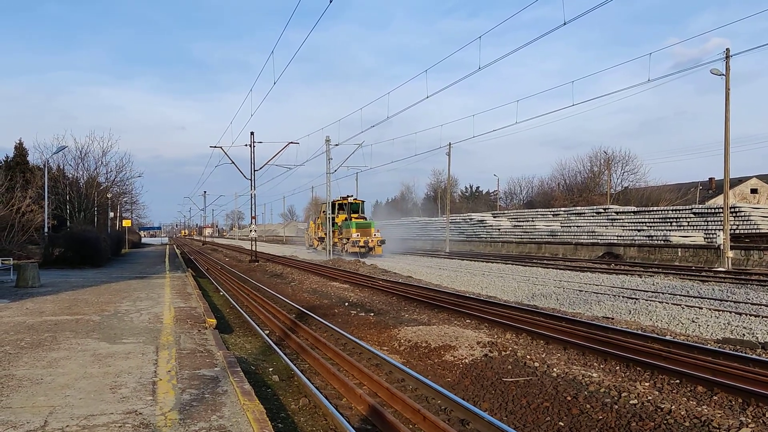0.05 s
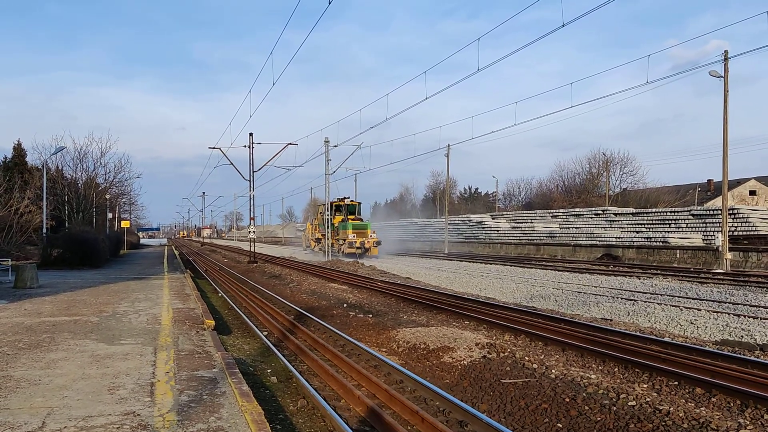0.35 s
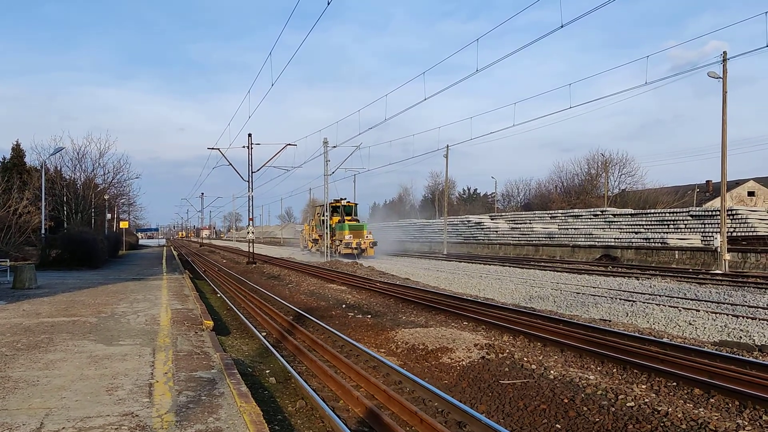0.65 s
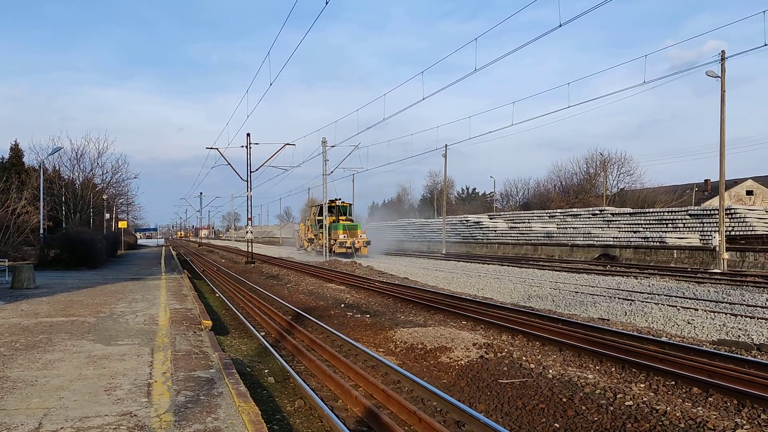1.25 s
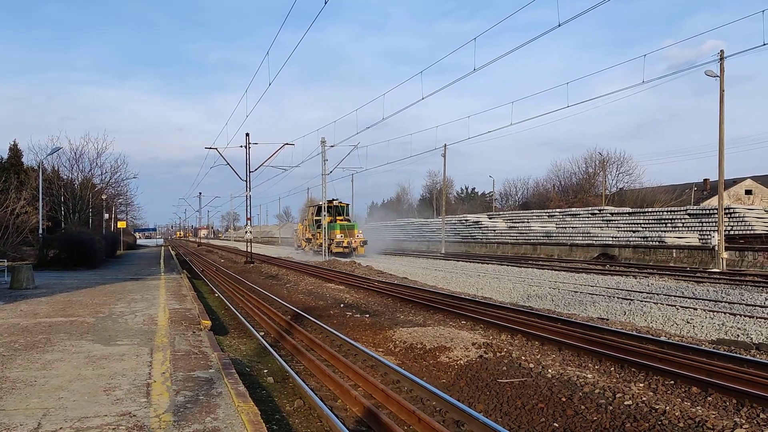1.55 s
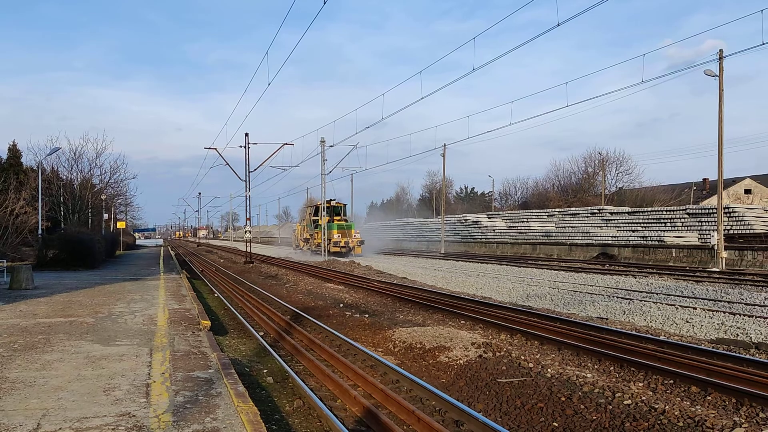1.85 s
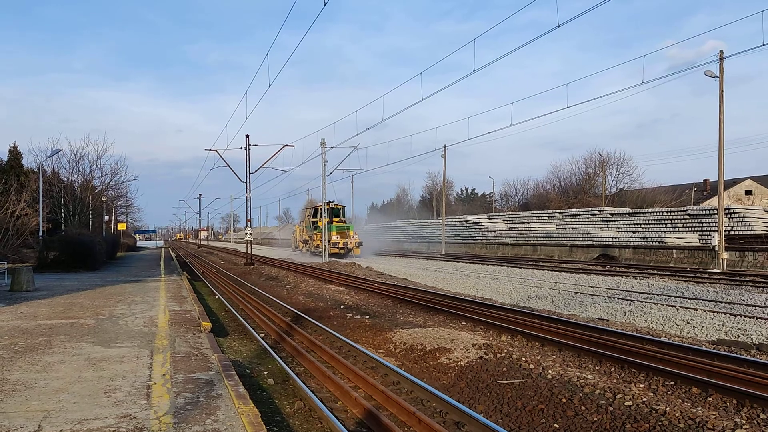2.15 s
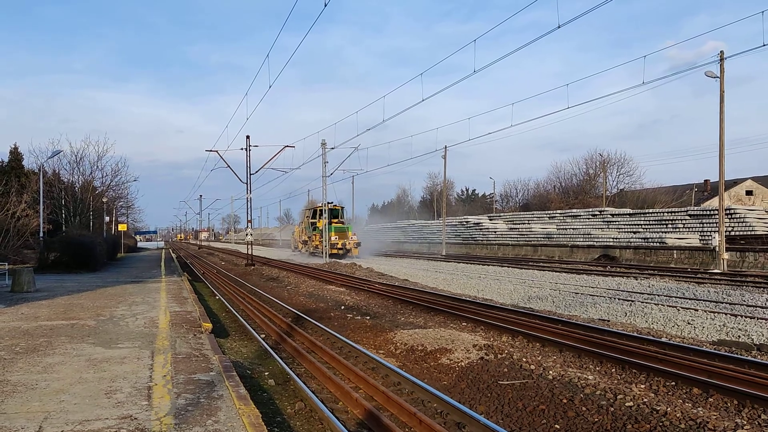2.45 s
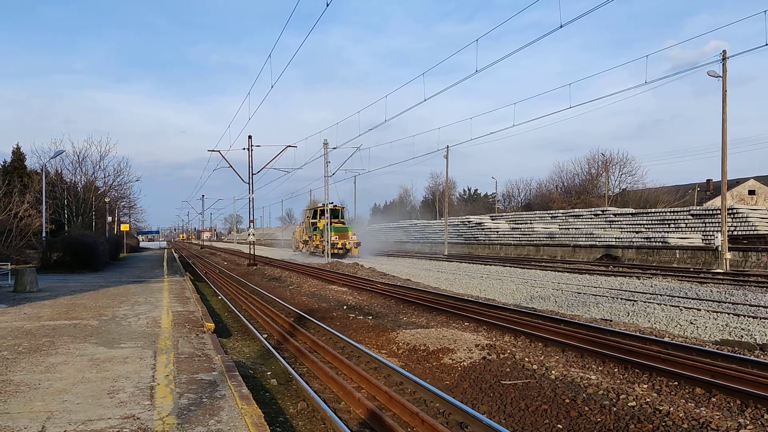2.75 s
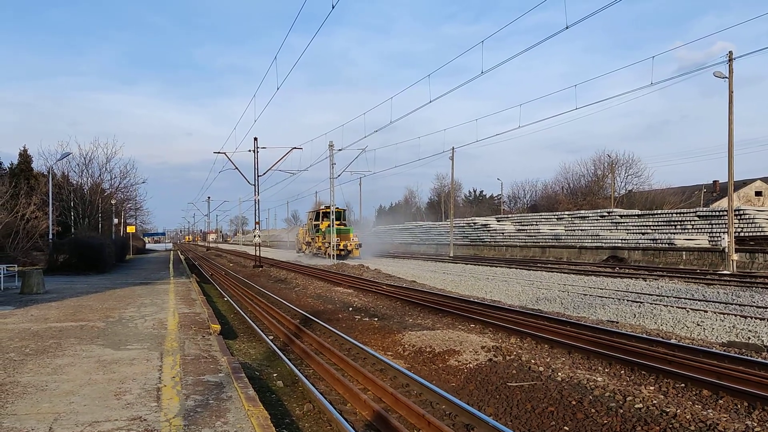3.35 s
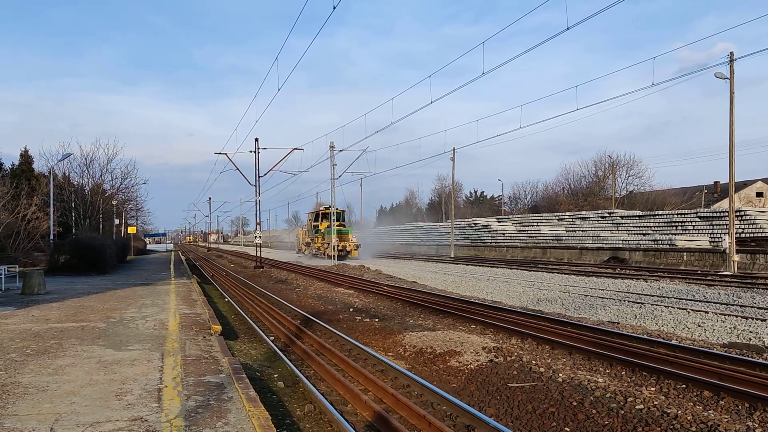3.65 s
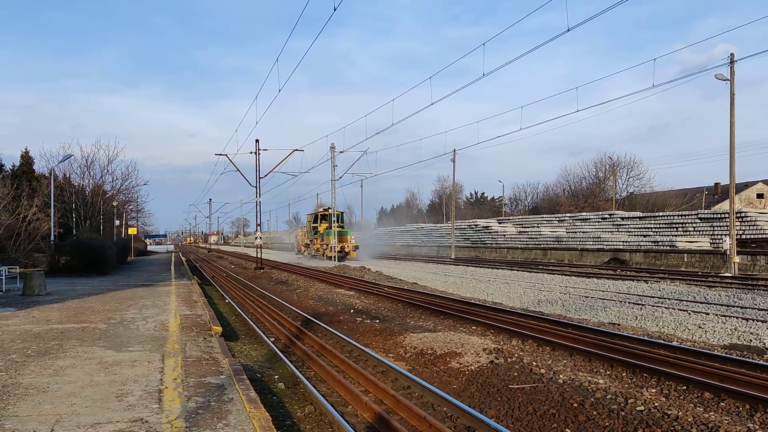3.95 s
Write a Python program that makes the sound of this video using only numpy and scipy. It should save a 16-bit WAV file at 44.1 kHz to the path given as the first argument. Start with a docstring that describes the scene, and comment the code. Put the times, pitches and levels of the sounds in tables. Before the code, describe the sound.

A railway maintenance machine sweeps track stones in the distance, a steady rushing roar over a diesel drone and faint whine. Wind rumbles and thumps on the microphone at an open platform, strongest about a second in.

```python
"""A ballast machine sweeps the track some way from a station platform: its diesel drones in harmonics
of the firing cycle, its hydraulics whine, and its brush churns stones in a resonant steel housing.
Wind buffets the two microphone ports with turbulent pressure, mostly the left one. The strongest
gusts drive the recorder's limiter, so the machine ducks and swells back."""
import sys
import numpy as np
from scipy import signal
from scipy.fft import rfft, irfft
from scipy.io import wavfile
from scipy.ndimage import uniform_filter1d, minimum_filter1d

SR = 44100
rng = np.random.default_rng(int(sys.argv[2]) if len(sys.argv) > 2 else 0)


def persist_wave(psi):
    """Save psi, clipped to +-1, as 16-bit WAV."""
    counts = np.round(np.clip(psi, -1, 1) * 32767).astype(np.int16)
    wavfile.write(sys.argv[1], SR, np.atleast_2d(counts).T)


N = 176400


def undb(db):
    """Amplitude ratio of a level in decibels."""
    return 10 ** (np.asarray(db) / 20)


def level(x, db):
    """Normalisation to an rms level."""
    return x * undb(db) / np.sqrt(np.mean(x ** 2))


def per_bin(table, column=1):
    """Interpolation of a table column over log frequency, at every spectral bin."""
    rows = np.array(table, float)
    hz = np.maximum(np.fft.rfftfreq(N, 1 / SR), 1)
    return np.interp(np.log(hz), np.log(rows[:, 0]), rows[:, column])


def colour(x, spectrum):
    """Zero-phase filtering by (frequency [Hz], gain [dB]) points."""
    return irfft(rfft(x) * undb(per_bin(spectrum)), N)


def walk(bandwidth_hz):
    """Low-pass Gaussian noise: a smooth random modulation of unit variance."""
    hz = np.fft.rfftfreq(N, 1 / SR)
    spectrum = rfft(rng.standard_normal(N)) * np.exp(-(hz / bandwidth_hz) ** 2) * (hz > 0)
    return level(irfft(spectrum, N), 0)


def tone(hz, db, flutter_db):
    """Amplitude modulation: a sine of varying pitch flutters in the moving air."""
    phase = 2 * np.pi * (np.cumsum(hz) / SR + rng.random())
    return level(np.sin(phase) * undb(flutter_db * walk(5.5)), db)


# diesel harmonics (order [multiple of the cycle rate], relative level [dB])
ENGINE_ORDERS = [(3, -4.5), (5, -3), (6, -10), (8, -4), (10, -7), (14, -13.5), (17, -24)]


def engine():
    """Periodic firing: a governed diesel radiates harmonics of its cycle, which is two shaft turns."""
    cycle_hz = 14.97 * (1 + 0.0023 * walk(1.7))
    drone = sum(tone(order * cycle_hz, db, flutter_db=4) for order, db in ENGINE_ORDERS)
    return level(drone, db=-29)


# hydraulic whine (frequency [Hz], level [dB])
PUMP_TONES = [(309, -43), (457, -48), (618.3, -48)]


def hydraulics():
    """Common frequency modulation: the pump tones waver together with its speed."""
    speed = 1 + 0.0021 * walk(4.6)
    return sum(tone(hz * speed, db, flutter_db=3.5) for hz, db in PUMP_TONES)


# roar of brush and stones (frequency [Hz], relative spectral density [dB])
BALLAST_SPECTRUM = [(30, 11), (130, 7), (200, 2.5), (270, -4), (340, 1), (420, 0), (500, -7.5), (600, 0.5),
                    (850, -1), (1120, -7.5), (1500, -1.5), (1850, -7.5), (2080, -5), (2280, -5.5),
                    (2390, -9.5), (2550, -11), (3100, -18.5), (3900, -18), (4400, -22.5), (4800, -21),
                    (5150, -18), (5500, -22.5), (6130, -19.5), (6550, -29.5), (7400, -33), (8300, -39)]


def ballast(stones_per_s=2500, spread_db=2, stone_share=0.35):
    """Shot noise: random stone impacts add in power to rushing air, coloured by the brush housing."""
    impacts = (rng.random(N) < stones_per_s / SR) * rng.choice([-1, 1], N)
    knocks = level(impacts * undb(spread_db * np.minimum(rng.exponential(size=N), 5)), 0)
    air = rng.standard_normal(N)
    roar = np.sqrt(stone_share) * knocks + np.sqrt(1 - stone_share) * air
    return level(colour(roar, BALLAST_SPECTRUM), db=-26)


# modes of the brush housing (frequency [Hz], half width [Hz], initial level at unit load [dB])
HOUSING_MODES = [(2100, 45, -50), (2232, 63, -48.5)]


def housing(t, growth_db_per_s=1.55):
    """Resonance: under the stones, each steel mode rings as narrow-band noise that drifts and grows."""
    drift = 1 + 0.005 * walk(2.496)
    ring = 0
    for hz, width_hz, db in HOUSING_MODES:
        phase = 2 * np.pi * np.cumsum(hz * drift) / SR
        ring += level(walk(width_hz) * np.cos(phase) + walk(width_hz) * np.sin(phase), db)
    return ring * undb(growth_db_per_s * t)


# load as the brush meets more or less ballast (time [s], gain [dB])
BRUSH_LOAD = [(0, 1.5), (.5, -2.5), (.72, 0.5), (.82, 1.5), (1, -1), (1.35, -1), (1.7, -0.6), (2.5, -0.53),
              (4, -0.25)]
# right port relative to the left (frequency [Hz], attenuation [dB], coherence [0-1])
RIGHT_RESPONSE = [(98, -4, 0.92), (330, -1, 0.82), (610, 4.5, 0.92), (980, 5.5, 0.5), (1400, 12.5, 0.6),
                  (1790, 10, 0.3), (2250, 14, 0.9), (2600, 10, 0.03), (3140, 12, 0.3), (4050, 14.5, 0),
                  (5000, 19.5, 0.1), (5700, 29, 0.5), (7500, 15.5, 0)]
# later arrival at the right port (frequency [Hz], delay [ms])
RIGHT_DELAY = [(300, 0.39), (900, 0.35), (1500, 0.21), (2000, 0.45), (3000, 0.98), (5000, 1)]


def machine(t, churn_db=0.5):
    """Partial coherence: the right port hears the machine later, duller and with scattered roar."""
    load = undb(np.interp(t, *np.array(BRUSH_LOAD).T) + churn_db * walk(20))
    left = engine() + hydraulics() + load * (ballast() + housing(t))
    coherence = np.clip(per_bin(RIGHT_RESPONSE, column=2), 0, 1)
    delay = np.exp(-2j * np.pi * np.fft.rfftfreq(N, 1 / SR) * per_bin(RIGHT_DELAY) / 1000)
    direct = coherence * delay * rfft(left)
    scattered = np.sqrt(1 - coherence ** 2) * rfft(load * ballast())
    right = irfft((direct + scattered) * undb(-per_bin(RIGHT_RESPONSE)), N)
    return np.array([left, right])


def crested(flow, skew=0.15):
    """Skewness of turbulent pressure: pointed pushes and rounded suction, at unit rms."""
    steady = flow / np.sqrt(uniform_filter1d(flow ** 2, size=SR // 8))
    return level(steady + skew * (steady ** 2 - 1), 0)


# wind pressure on the ports (time [s], left level [dB], right level [dB])
WIND_LEVELS = [(0, -7, -4.5), (.15, -10, -9), (.25, -17, -9.5), (.42, -18, -14.5), (.55, -18, -11.5),
               (0.649, -19, -17), (.8, -17, -15.5), (.97, -4.5, -10.5), (1.101, -15.5, -13.5),
               (1.35, -13, -17), (1.549, -12.5, -16.5), (1.8, -11.5, -11.5), (2.05, -16, -22.5),
               (2.3, -14, -18), (2.5, -19, -22.5), (2.68, -14.5, -28), (3.099, -12.5, -26),
               (3.3, -17.5, -35), (3.54, -9.5, -25), (3.699, -21, -25.5), (3.861, -15.5, -20.5),
               (4, -22.5, -41)]
# turbulence (frequency [Hz], relative spectral density [dB])
WIND_SPECTRUM = [(6, -24), (16, -2), (30, 3), (48, -0.5), (70, -3.5), (110, -11.5), (160, -19),
                 (250, -22.5), (400, -29.5), (700, -37.5), (1500, -54.5), (4000, -81.5)]


def wind(t, eddy_db=2, split_hz=120):
    """Intermittency: each port rumbles independently, and small eddies make the upper band spurt."""
    times, *port_levels = np.array(WIND_LEVELS).T
    ports = []
    for db in port_levels:
        flow = colour(rng.standard_normal(N), WIND_SPECTRUM)
        low = signal.sosfiltfilt(signal.butter(2, split_hz, fs=SR, output="sos"), flow)
        spurts = level(undb(eddy_db * walk(88)), 0)
        rumble = low + (flow - low) * spurts
        ports.append(crested(rumble) * undb(np.interp(t, times, db)))
    return np.array(ports)


# eddies striking the ports (centre time [s], time scale [s], peak before saturation [dB],
# left minus right [dB], spectral tilt [dB/octave], turbulent share [0-1])
EDDY_STRIKES = [(0.031, 0.034, 2.5, 16, 5, 0.8), (0.083, 0.023, 1.5, 11, 4, 0.97),
                (.124, 0.023, .5, 13, 4.5, 0.96), (.16, .02, -4, 5, 1, .9),
                (0.256, 0.029, -11.5, -18, 1, 0.66), (0.31, 0.03, -6.5, 11, -2, 0.7),
                (.398, 0.015, -2.5, -8, 2.5, 0.5), (0.468, 0.022, -5, 13, 2, 0.43),
                (0.502, 0.016, -3, -18, -6, 0.26), (0.592, .011, -1.5, 15, 3, 0.48),
                (0.743, 0.015, -3.5, -12, 4, 0.54), (0.853, 0.0093, 8, 25.5, -3, 0.55),
                (0.877, .016, 8.5, 20, 3.5, 1), (0.884, .004, 10, 27, 6, 0.42),
                (.903, 0.016, 12, 21, -1, .85), (.945, 0.037, -0.5, 7.5, 0.5, 0.64),
                (1.023, 0.02, 4, 5.5, -1.5, 0.6), (1.136, 0.024, -5.5, -2.5, -0.5, 0.8),
                (1.182, 0.014, 0, 11, -6, 0.4), (1.202, .008, -6.5, 5, 2, 0.54),
                (1.262, 0.016, -2, 5.5, -4, 0.43), (1.326, 0.021, -0.5, 9, -1.5, 0.7),
                (1.694, .03, -9.5, -3, 1, 1), (1.774, 0.031, -1, 6.5, -5.5, 0.46),
                (1.813, 0.012, 2.5, 17.5, -2.5, 0.39), (2.208, .036, -0.5, 11.5, -5.5, 0.93),
                (2.381, 0.027, -3, 23, -9, .2), (2.442, 0.0081, -6.5, 15, 2, 0.25),
                (2.869, 0.1, -.5, 9.5, -11, 0.72), (3.139, 0.029, -6, 18, -9.5, 0.7),
                (3.194, 0.0087, -3.5, 19, 2.5, 0.47), (3.475, .028, -4.5, 19, -19, 0.8),
                (3.519, .0062, -0.5, 22, 3, .5), (3.593, 0.016, -2.5, 25, -14, .25),
                (3.619, 0.0098, -3.5, 21, -2, 0.6)]
# turbulence within a buffet (frequency [Hz], relative spectral density [dB])
BUFFET_SPECTRUM = [(15, 4.5), (50, 4.5), (120, 0), (220, -7.5), (400, -15), (700, -24.5), (1100, -41.5),
                   (1500, -44), (2100, -54), (5000, -81)]


def buffets(t, flip_s=0.0014, tilt_from_hz=177, overload_db=7.5):
    """Bipolar pulses: an eddy's push flips to suction amid turbulence; the microphone rounds the peaks."""
    ports = np.zeros((2, N))
    for port, side in zip(ports, (1, -1)):
        flow = crested(colour(rng.standard_normal(N), BUFFET_SPECTRUM))
        for centre, length, db, pan_db, tilt_db, share in EDDY_STRIKES:
            near = np.abs(t - centre) < 2 * length
            age = t[near] - centre
            swell = np.exp(-2 * (age / length) ** 2)
            push = -np.tanh(age / flip_s) * np.exp(-np.abs(age) / length)
            blast = (1 - share) * level(push * swell, 0) + share * level(flow[near] * swell, 0)
            octaves = np.log2(np.hypot(np.fft.rfftfreq(len(age), 1 / SR) / tilt_from_hz, 1))
            blast = irfft(rfft(blast) * undb(tilt_db * octaves), len(age))
            blast *= signal.windows.tukey(len(age))
            port[near] += blast / np.abs(blast).max() * undb(db + min(side * pan_db, 0))
    return undb(overload_db) * np.tanh(ports / undb(overload_db))


def scene():
    """Superposition: the machine's sound and the wind's pressure add at each port."""
    t = np.arange(N) / SR
    return machine(t) + wind(t) + buffets(t)


def record(dry):
    """Peak limiting: both channels duck together and recover slowly; a low-pass cuts the top."""
    ceiling_db, recovery_db_per_s, lookahead_s, top_hz = -1, 18, 0.0079, 8100
    peak_db = 20 * np.log10(np.abs(dry).max(axis=0) + 1e-9)
    excess_db = np.maximum(peak_db - ceiling_db, 0)
    recovery_db = recovery_db_per_s * np.arange(N) / SR
    gain = undb(recovery_db - np.maximum.accumulate(excess_db + recovery_db))
    window = int(2 * lookahead_s * SR)
    gain = uniform_filter1d(minimum_filter1d(gain, window), window)  # eases down ahead of each peak
    lowpass = signal.ellip(8, 0.2, 70, top_hz, fs=SR, output="sos")
    return signal.sosfilt(lowpass, dry * gain)


dry = scene()
out = record(dry)
persist_wave(out)
```